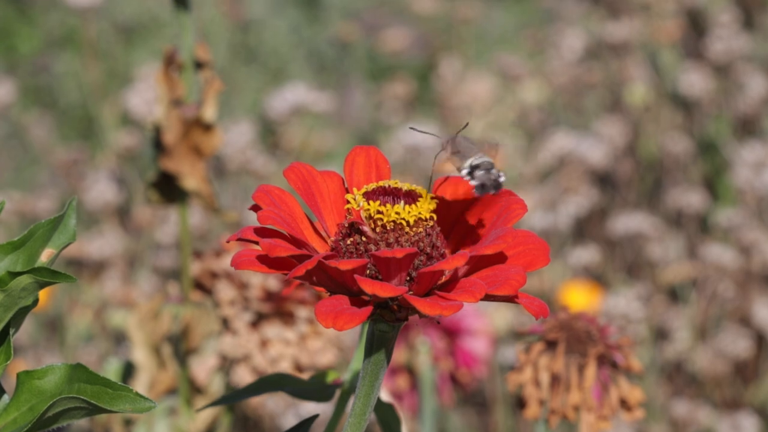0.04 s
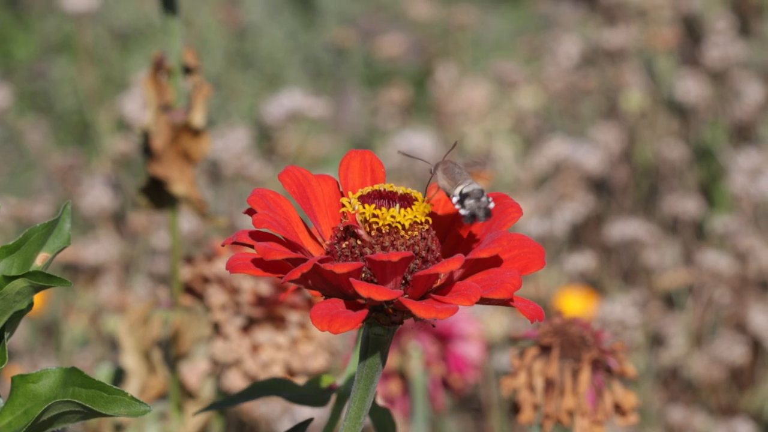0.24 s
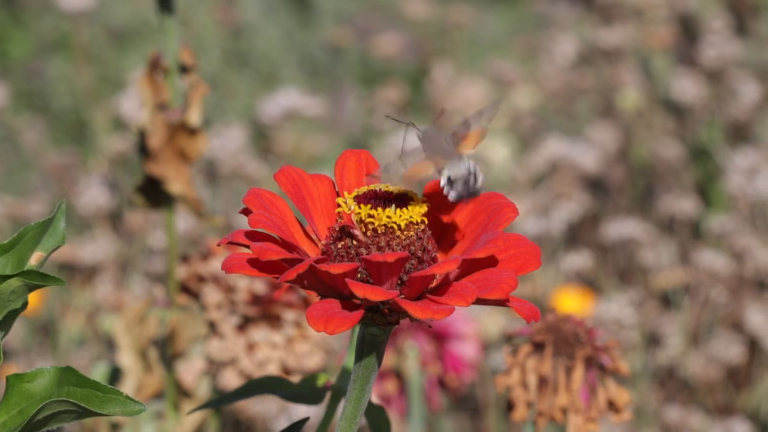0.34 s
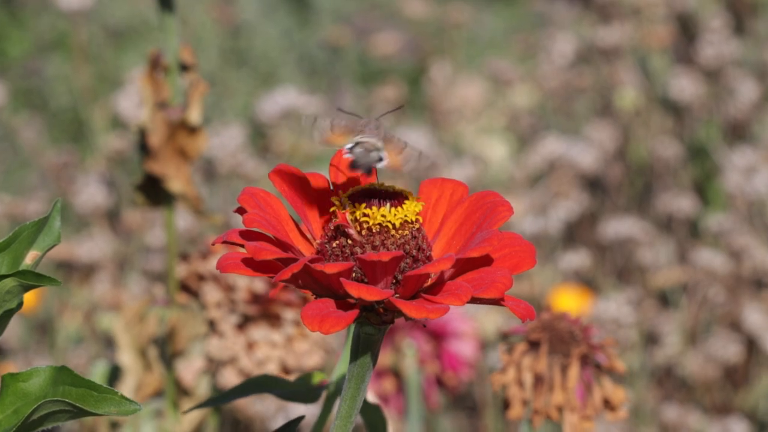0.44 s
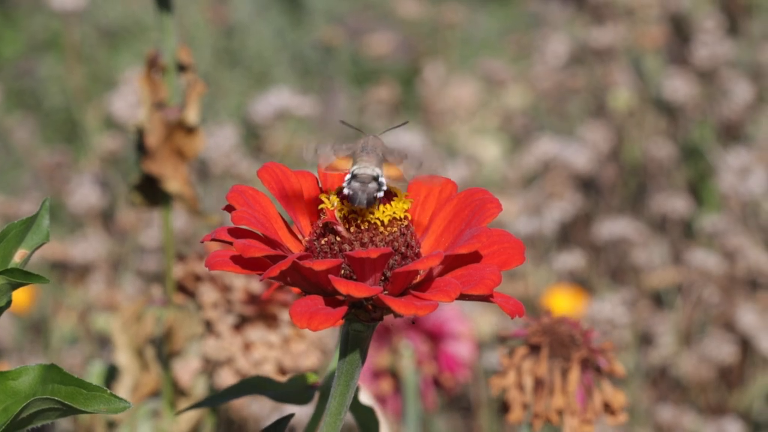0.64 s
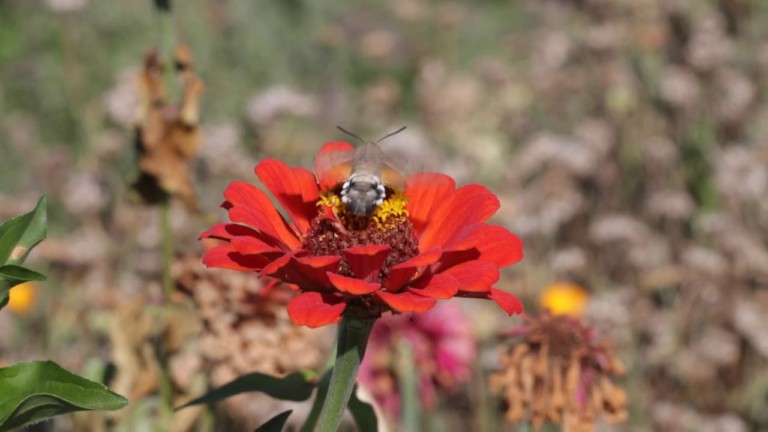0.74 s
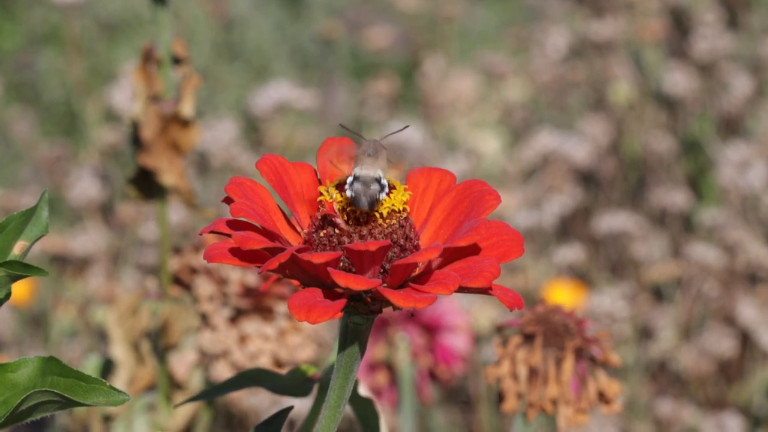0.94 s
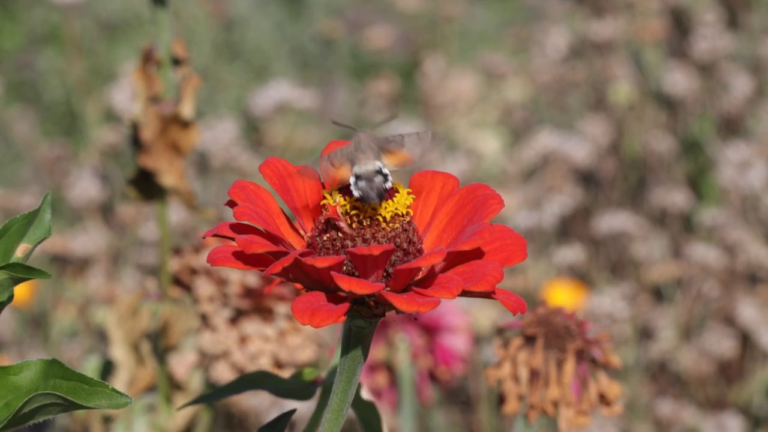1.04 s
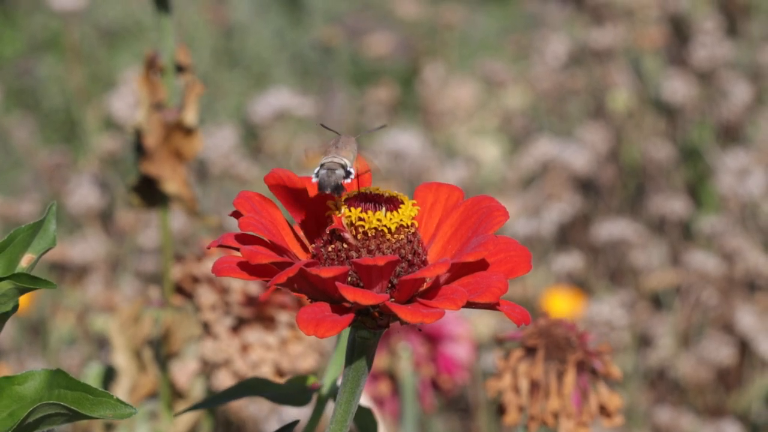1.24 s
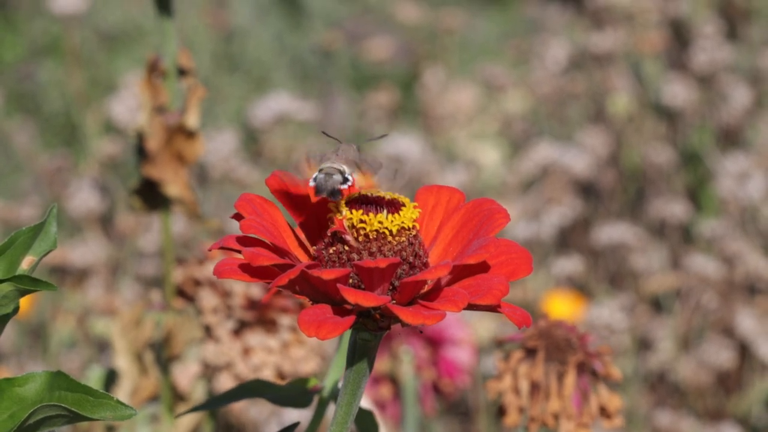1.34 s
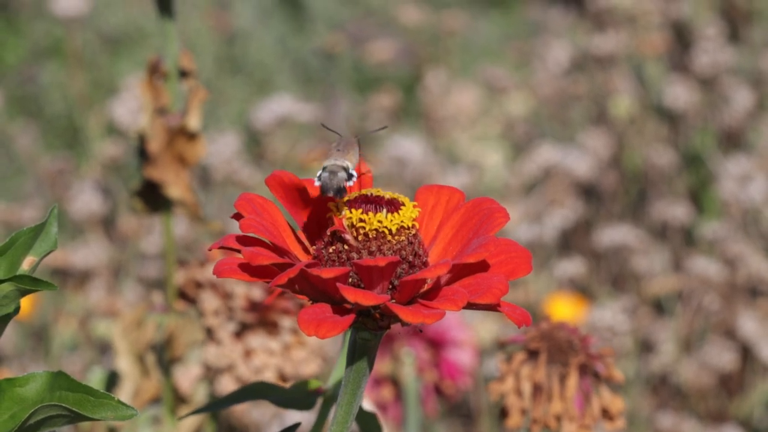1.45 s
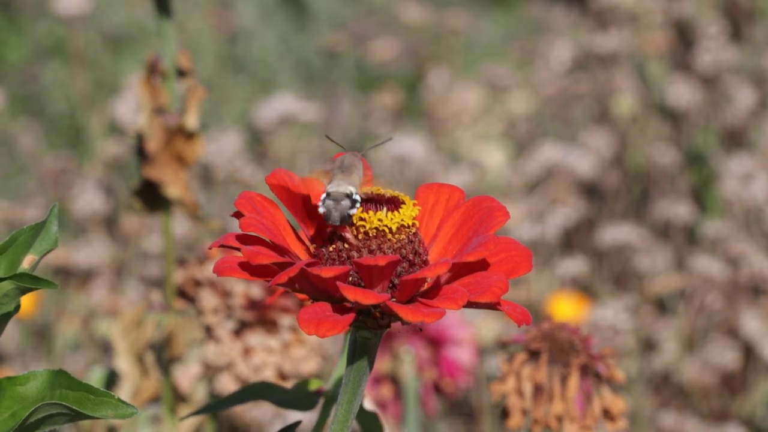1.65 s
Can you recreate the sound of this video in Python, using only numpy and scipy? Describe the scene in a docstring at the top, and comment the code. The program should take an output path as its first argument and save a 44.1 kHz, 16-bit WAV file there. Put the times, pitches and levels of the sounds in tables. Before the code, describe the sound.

Wind blows gently outdoors over a low rumble of far traffic and the soft wing hum of a hovering moth. About halfway through, short low gusts begin buffeting the microphone, then die away just before the end.

```python
"""A garden in light wind. A hawk moth hovers at a flower, its wings humming softly at the stroke
rate and its octave. Distant traffic rumbles, an engine drones and the tyres of one far vehicle sing.
The air hisses, dry leaves rustle and tick, and two faint whistles sound far off. A few brief gusts
and the eddies inside them thump on the microphone."""
import sys
import numpy as np
from scipy import signal
from scipy.fft import rfft, irfft
from scipy.io import wavfile

SR = 44100
rng = np.random.default_rng(int(sys.argv[2]) if len(sys.argv) > 2 else 0)


def log_audio(samples):
    """Write samples as a 16-bit WAV file to the path given in sys.argv[1]."""
    # one column per channel
    frames = np.atleast_2d(samples).T
    # limit to full scale, then quantise
    limited = np.clip(frames, -1, 1)
    pcm = np.round(limited * 32767).astype(np.int16)
    wavfile.write(sys.argv[1], SR, pcm)


N = 74970
T = np.arange(N) / SR
FREQS = np.maximum(np.arange(N // 2 + 1) * SR / N, 1)


def undb(db):
    """Decibels to gain."""
    return 10 ** (np.asarray(db) / 20)


def curve(table, column=1):
    """One table column, linearly interpolated over time."""
    rows = np.array(table)
    return np.interp(T, rows[:, 0], rows[:, column])


def noise(gain):
    """Noise of rms 1, shaped by a gain per frequency."""
    x = irfft(gain * np.exp(2j * np.pi * rng.random(len(FREQS))), N)
    return x / x.std()


def band_noise(hz, width_hz):
    """Noise of rms 1 in a steep band."""
    return noise(1 / (1 + ((FREQS ** 2 - hz ** 2) / (FREQS * width_hz)) ** 4))


def drift(rate_hz):
    """Smooth random drift of rms 1."""
    return noise(np.exp(-.5 * (FREQS / rate_hz) ** 2))


def bell(centre_s, length_s):
    """Gaussian envelope, peak 1."""
    return np.exp(-2 * ((T - centre_s) / length_s) ** 2)


def pan(x, pan_db):
    """Mono to stereo; pan is left minus right level."""
    return np.array([x * undb(pan_db / 2), x * undb(-pan_db / 2)])


def wash(spectrum, swell_db, bands=14, flicker_db=.53, flicker_hz=4.4):
    """Coloured noise whose bands swell together and flicker separately."""
    hz, db = np.array(spectrum).T
    colour = undb(np.interp(np.log(FREQS), np.log(hz), db))
    low_rolloff = np.minimum(FREQS / hz[0], 1) ** 2
    bins = rfft(noise(colour * low_rolloff))
    band_index = np.interp(np.log(FREQS), np.log([hz[0], hz[-1]]), [0, bands - 1])
    out = 0
    for k in range(bands):
        band = irfft(bins * np.maximum(1 - abs(band_index - k), 0), N)
        out = out + band * undb(swell_db + flicker_db * drift(flicker_hz))
    return out


# Traffic and air, common to both channels. Each row: frequency in Hz, relative density in dB.
MID_SPECTRUM = [(20, -6.5), (42, 2), (70, -1), (100, -3.5), (128, -3), (165, -5.5), (205, -7.5), (260, -13),
                (350, -18.5), (470, -14), (700, -14.5), (810, -18.5), (950, -18.5), (1300, -19.5),
                (1900, -27), (3000, -35.5), (6500, -46.5), (10000, -55.5), (13000, -62.5)]
# Traffic and air, channel difference. Each row: frequency in Hz, relative density in dB.
SIDE_SPECTRUM = [(25, -19), (55, -6), (85, -26), (125, -4), (230, -2.5), (330, -3), (550, -4), (1400, -5.5),
                 (2000, -10), (4000, -17), (6800, -24), (9300, -30.5), (13000, -41)]

def rumble_and_air():
    """Far traffic rumbles in the middle, the breeze hisses wide above it."""
    swell_db = .47 * drift(rate_hz=1.35)
    mid = undb(-43) * wash(MID_SPECTRUM, swell_db)
    side = undb(-54.5) * wash(SIDE_SPECTRUM, swell_db)
    return np.array([mid + side, mid - side]) * pan(np.ones(N), pan_db=-.24)


# Far whistles. Each row: centre in seconds, length in seconds, peak in dB, pitch in Hz.
WHISTLE_NOTES = [(1.504, .009, -65.5, 4350), (1.59, 0.045, -50, 967)]

def whistles():
    """Faint far whistles swell and fade, each on one pitch."""
    notes = sum(undb(db) * bell(centre_s, length_s) * np.sin(2 * np.pi * (hz * T + rng.random()))
                for centre_s, length_s, db, hz in WHISTLE_NOTES)
    return pan(notes, pan_db=0)


# Leaf ticks. Each row: time in seconds, level in dB, band centre in Hz.
LEAF_TICKS = [(0.357, -62, 3420), (0.844, -60, 3620)]

def leaves(tick_s=.005):
    """Dry leaves rustle briefly, then tick; left and right are uncorrelated."""
    def burst(centre_s, length_s, db, hz, width_hz):
        grain = np.array([band_noise(hz, width_hz) for _ in range(2)])
        return undb(db) * bell(centre_s, length_s) * grain

    rustle = burst(centre_s=.059, length_s=.11, db=-79, hz=6500, width_hz=3400)
    return rustle + sum(burst(at_s, tick_s, db, hz, width_hz=2100) for at_s, db, hz in LEAF_TICKS)


# Road roar. Each row: time in seconds, level in dB, pan in dB.
ROAD_PATH = [(0, -58.5, 10), (.6, -61, 8.5), (.9, -58, 8), (1.15, -55.5, 7), (1.3, -56.5, -2.5),
             (1.7, -57.5, -1)]

def road_roar():
    """Tyre roar drifts from the left to the middle."""
    roar = band_noise(hz=1064, width_hz=500) * undb(curve(ROAD_PATH))
    return pan(roar, curve(ROAD_PATH, column=2))


# Singing tyres. Each row: time in seconds, noise level in dB, tone level in dB.
TYRE_LEVELS = [(0, -56, -58), (.09, -60, -47.5), (.15, -56, -50.5), (.22, -48.5, -45), (.28, -59, -50),
               (.33, -62, -59), (.5, -57.5, -63), (.72, -52, -51.5), (.8, -53, -62), (.95, -60.5, -58),
               (1.1, -60, -67), (1.28, -55.5, -53.5), (1.55, -56.5, -71), (1.7, -55.5, -44.5)]

def singing_tyres(start_hz=543.2, rise_hz_per_s=25, skirt_hz=52.4):
    """A far vehicle's tread rings a slowly rising note inside a narrow band of noise."""
    phase = 2 * np.pi * np.cumsum(start_hz + rise_hz_per_s * T) / SR
    skirt = drift(skirt_hz) * np.cos(phase) + drift(skirt_hz) * np.sin(phase)
    tone = undb(curve(TYRE_LEVELS, column=2)) * np.sin(phase)
    return pan(undb(curve(TYRE_LEVELS)) * skirt + tone, pan_db=-1)


# Engine partials. Each row: frequency in Hz, rms level in dB.
ENGINE_PARTIALS = [(70, -50), (124, -51.5)]

def engine(waver=.013):
    """A far engine drones under the rumble, its partials wavering together."""
    warped_s = np.cumsum(1 + waver * drift(rate_hz=2.5)) / SR
    return np.sqrt(2) * sum(undb(db) * np.sin(2 * np.pi * (hz * warped_s + rng.random()))
                            for hz, db in ENGINE_PARTIALS)


# Gusts. Each row: centre in seconds, length in seconds, level in dB, upper edge in Hz, pan in dB.
GUST_BURSTS = [(.805, 0.058, -36, 53.7, 0.5), (0.941, 0.05, -43, 171, 7.5), (1.034, 0.05, -29.5, 98, 1),
               (1.119, 0.03, -40.5, 100, 3), (1.21, 0.031, -37, 85, 1.5), (1.265, 0.036, -31.5, 100, 7),
               (1.322, 0.031, -40.5, 119, 21), (1.343, 0.018, -25, 113.6, -4),
               (1.368, 0.042, -26.5, 140, -2.5), (1.414, 0.055, -35.5, 125, 5.5)]

def gusts(low_hz=44, slope=7.9, swirl_db=-13):
    """Turbulent air on the microphone: short, dull rumbles, slightly different at each port."""
    out = 0
    for centre_s, length_s, db, edge_hz, pan_db in GUST_BURSTS:
        colour = 1 / np.sqrt((1 + (FREQS / edge_hz) ** slope) * (1 + (low_hz / FREQS) ** 4))
        envelope = bell(centre_s, length_s)
        bursts = [envelope * noise(colour) for _ in range(2)]
        push, swirl = (x * np.sqrt(np.sum(envelope ** 2) / np.sum(x ** 2)) for x in bursts)
        out = out + undb(db) * (pan(push, pan_db) + undb(swirl_db) * np.array([swirl, -swirl]))
    return out


# Eddies in the gusts. Each row: centre in seconds, core half-length in seconds, peak in dB, pan in dB.
EDDY_CORES = [(1.0243, .0028, -23.5, 5.5), (1.048, 0.0016, -27.5, 7.5), (1.2662, .0038, -16.5, 5.5),
              (1.3545, 0.0035, -13, -2), (1.3855, 0.0046, -19.5, 4.5)]

def eddies(port_lag_s=.0008):
    """Each vortex crosses the ports, right first: a suction dip between two shoulders of pressure."""
    out = 0
    for centre_s, core_s, db, pan_db in EDDY_CORES:
        across = (T - centre_s - port_lag_s * np.array([[.5], [-.5]])) / core_s
        pressure = (2 * across ** 2 - 1) * np.exp(-across ** 2)
        out = out + undb(db) * pressure * pan(np.ones(N), pan_db)
    return out


# Wingbeat. Each row: time in seconds, stroke rate in Hz.
STROKE_RATE = [(0, 81.9), (.3, 81.77), (.62, 82.1), (1.0, 83.3), (1.3, 85.8), (1.7, 86.9)]
# Hum as the moth turns. Each row: time in seconds, fundamental in dB rms, octave in dB rms.
WING_LEVELS = [(0, -49, -49.5), (.24, -46, -57.5), (.33, -47, -43.5), (.6, -48, -41.5), (.68, -49, -49.5),
               (.95, -52, -50.5), (1.12, -48, -51.5), (1.48, -46, -45), (1.7, -56, -50.5)]

def moth(waver=.0058):
    """Beating wings hum at the stroke rate and its octave, straight ahead."""
    stroke_hz = curve(STROKE_RATE) * (1 + waver * drift(rate_hz=9.74))
    phase = 2 * np.pi * (np.cumsum(stroke_hz) / SR + rng.random())
    fundamental = undb(curve(WING_LEVELS)) * np.sin(phase)
    octave = undb(curve(WING_LEVELS, column=2)) * np.sin(2 * phase)
    return np.sqrt(2) * (fundamental + octave)


def scene(traffic_lag_s=.00005):
    """The garden in stereo; road roar and tyres reach the left port first."""
    left, right = road_roar() + singing_tyres()
    traffic = np.array([left, np.interp(T - traffic_lag_s, T, right)])
    return rumble_and_air() + traffic + engine() + moth() + gusts() + eddies() + leaves() + whistles()


def record(dry, low_cut_hz=31, high_cut_hz=13050):
    """The recorder thins the deepest rumble and cuts the top."""
    highpass = signal.butter(2, low_cut_hz, "high", fs=SR, output="sos")
    lowpass = signal.ellip(10, .2, 80, high_cut_hz, fs=SR, output="sos")
    return signal.sosfilt(lowpass, signal.sosfilt(highpass, dry))


dry = scene()
out = record(dry)
log_audio(out)
```